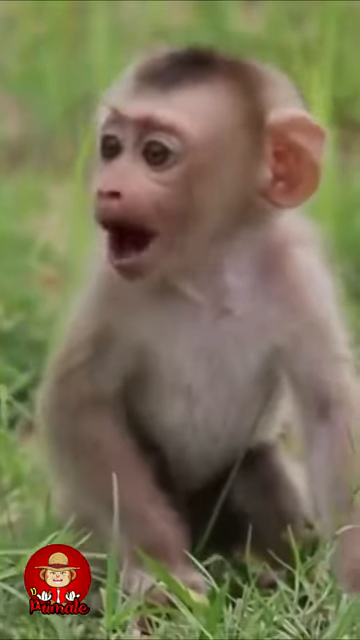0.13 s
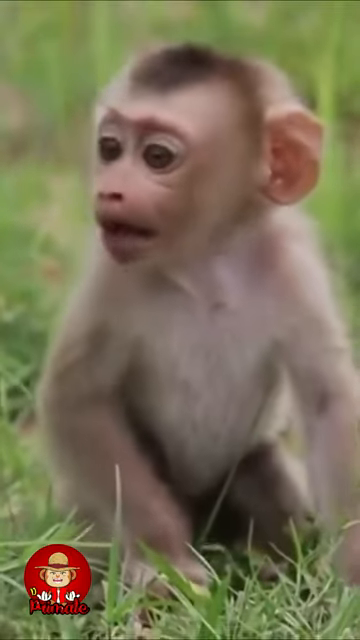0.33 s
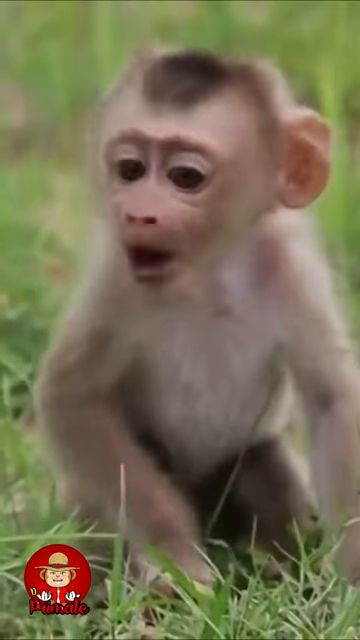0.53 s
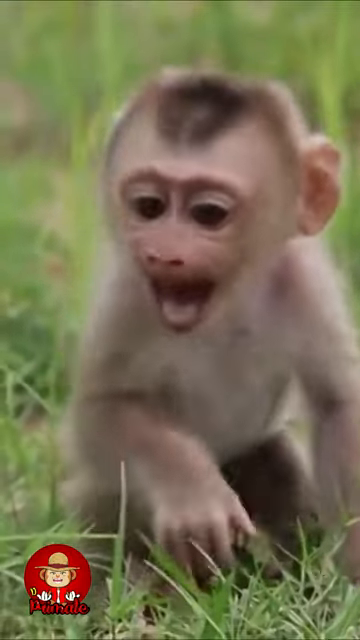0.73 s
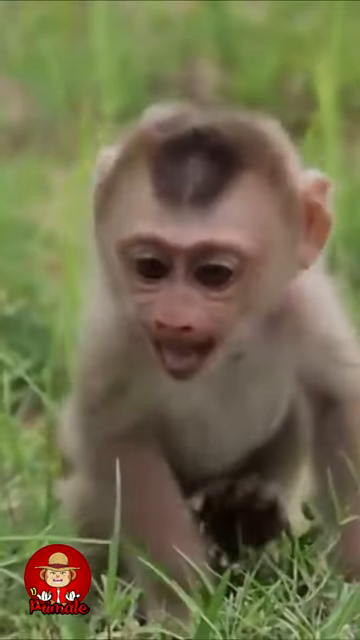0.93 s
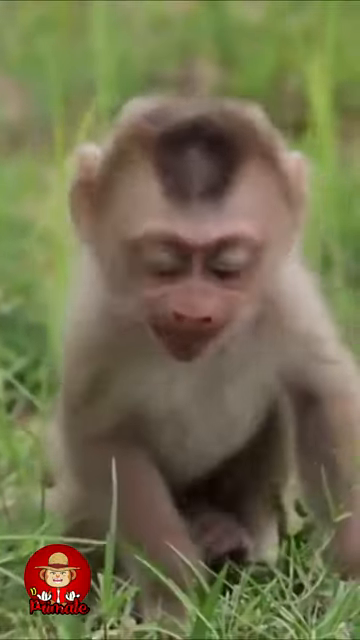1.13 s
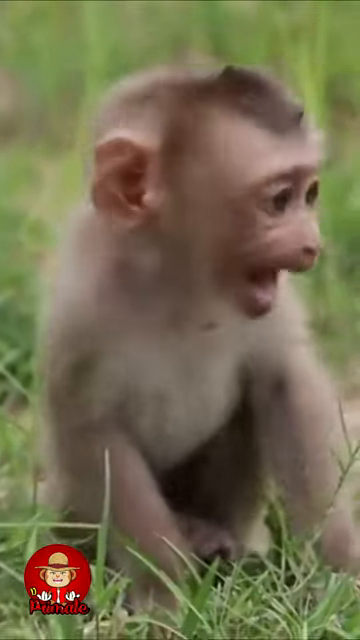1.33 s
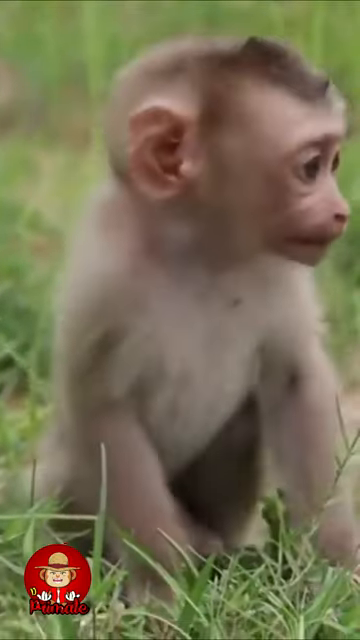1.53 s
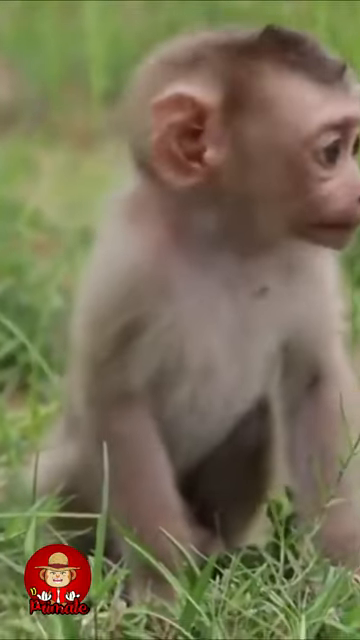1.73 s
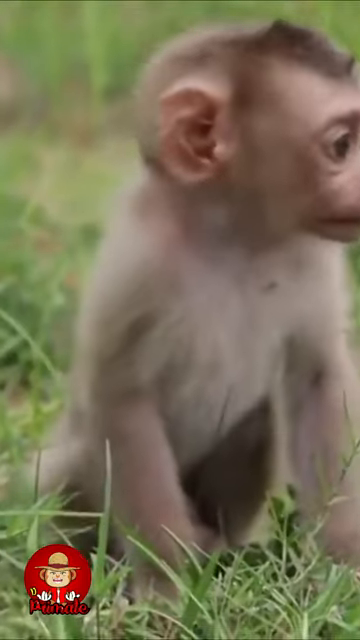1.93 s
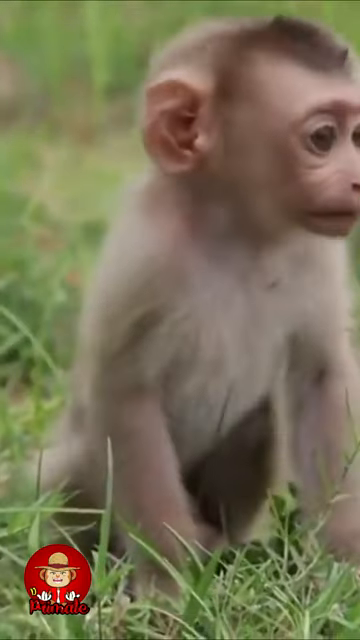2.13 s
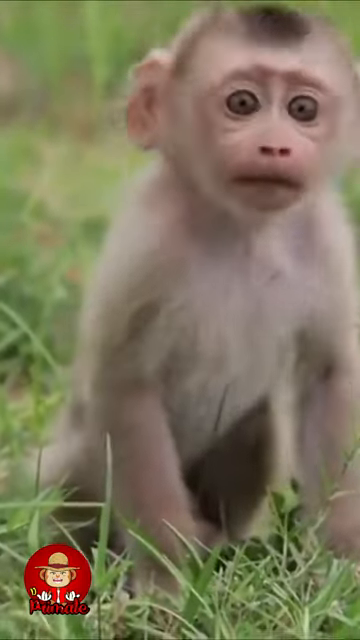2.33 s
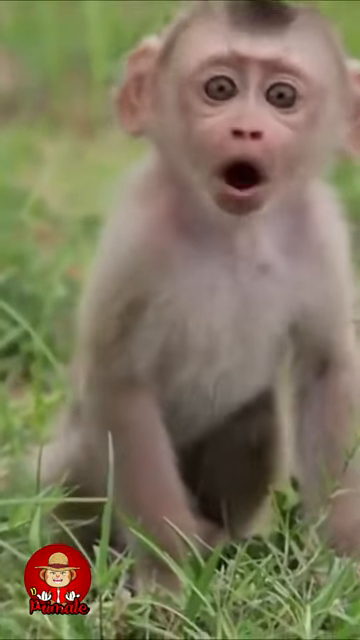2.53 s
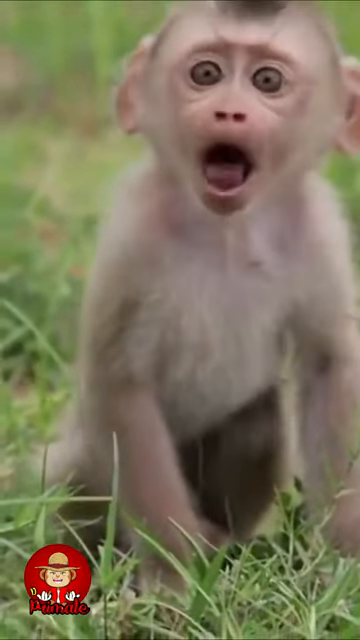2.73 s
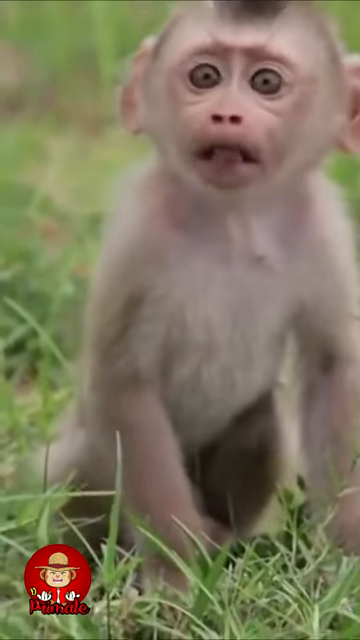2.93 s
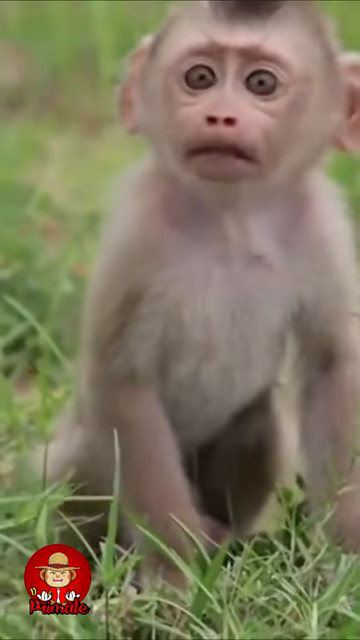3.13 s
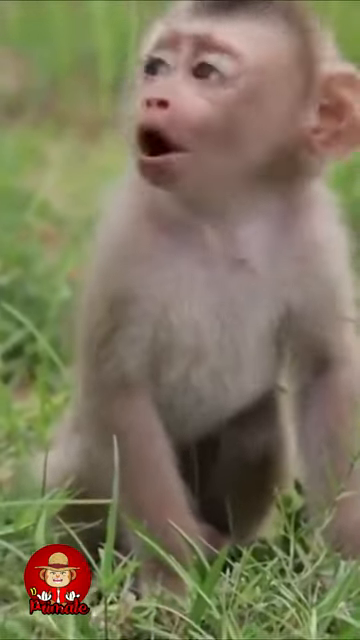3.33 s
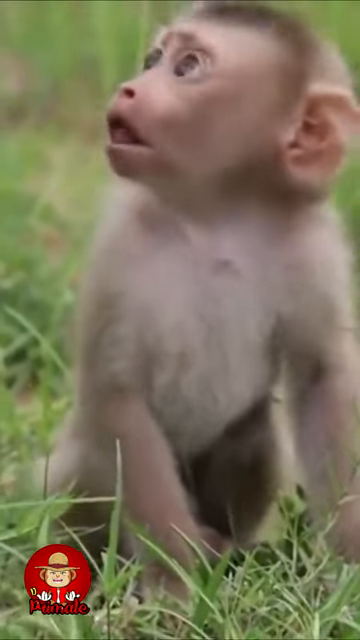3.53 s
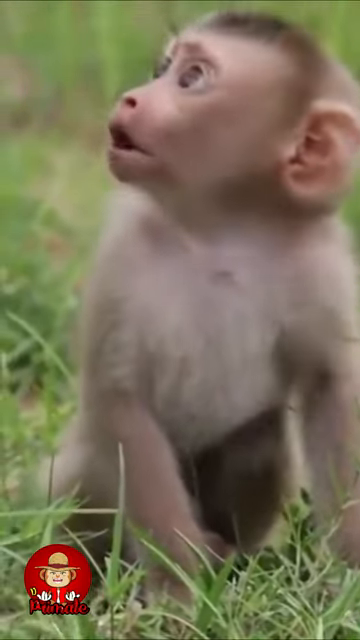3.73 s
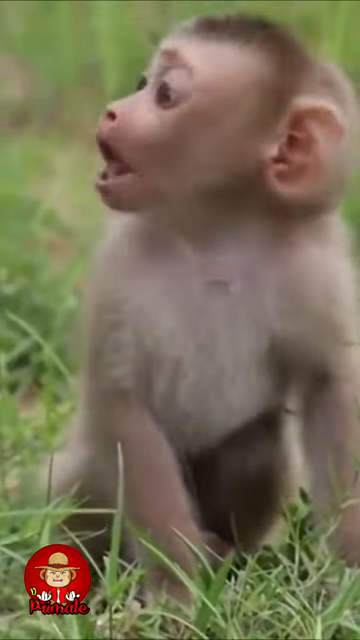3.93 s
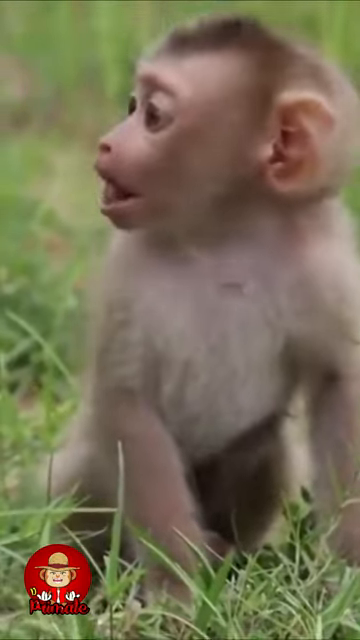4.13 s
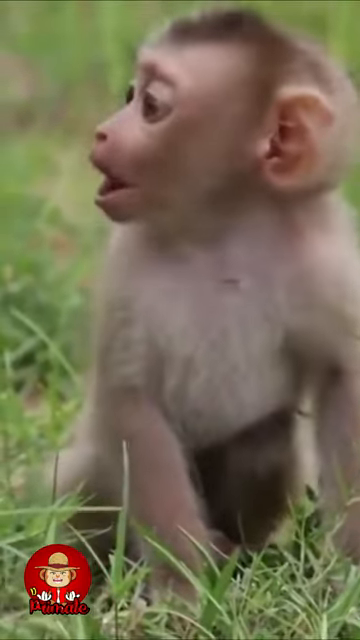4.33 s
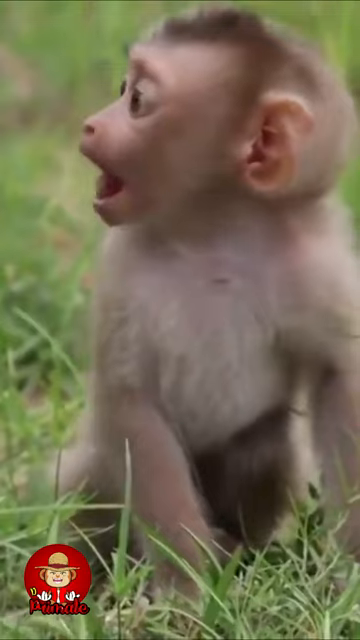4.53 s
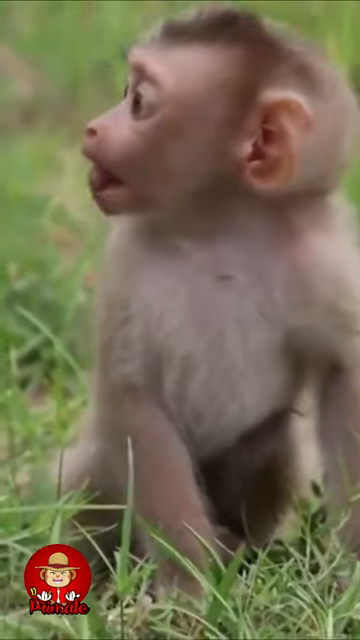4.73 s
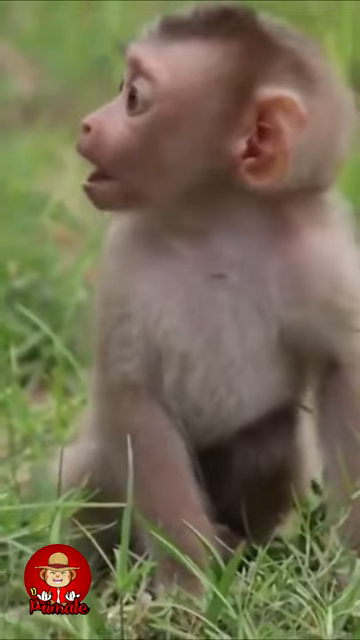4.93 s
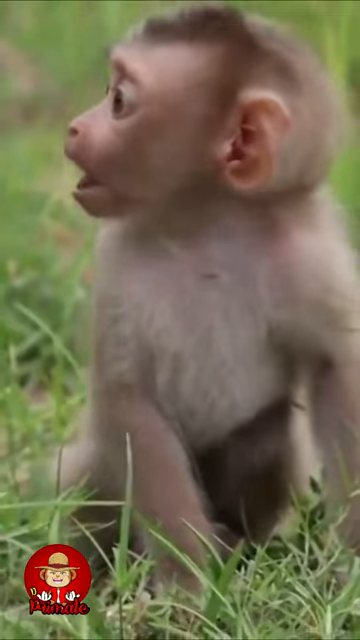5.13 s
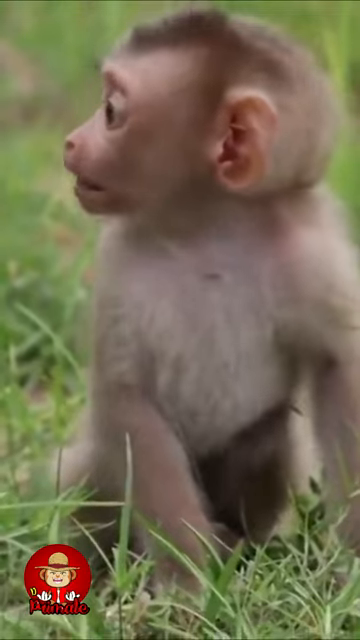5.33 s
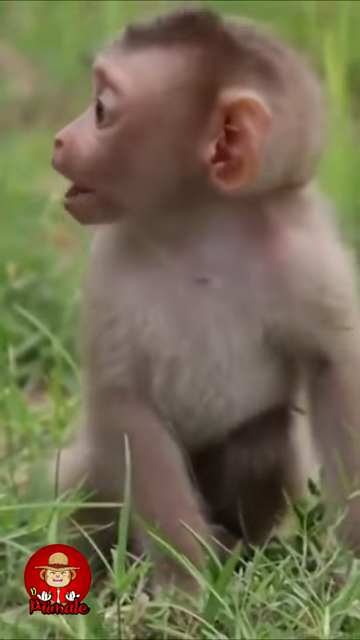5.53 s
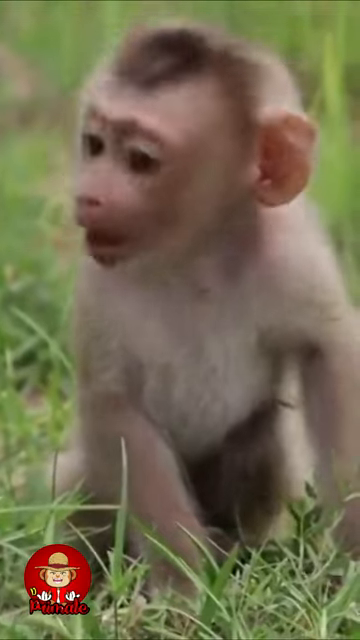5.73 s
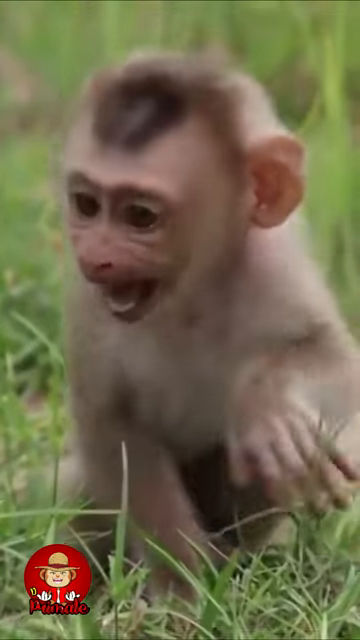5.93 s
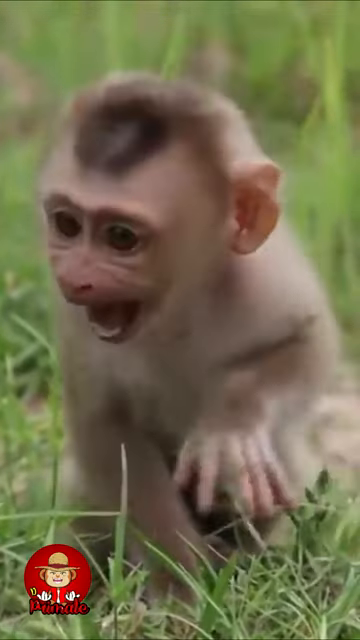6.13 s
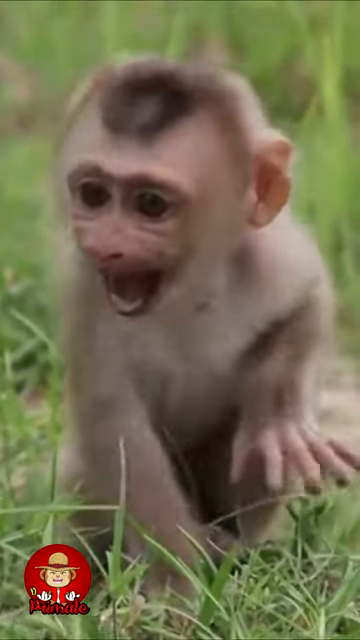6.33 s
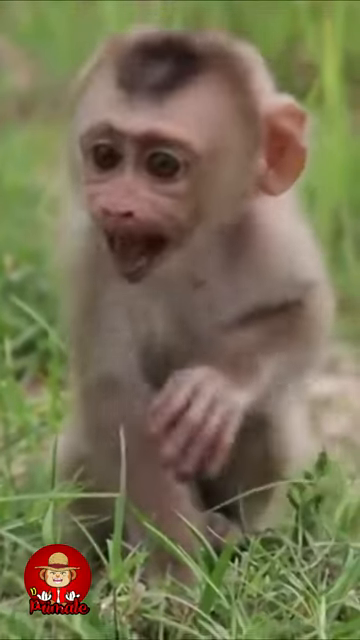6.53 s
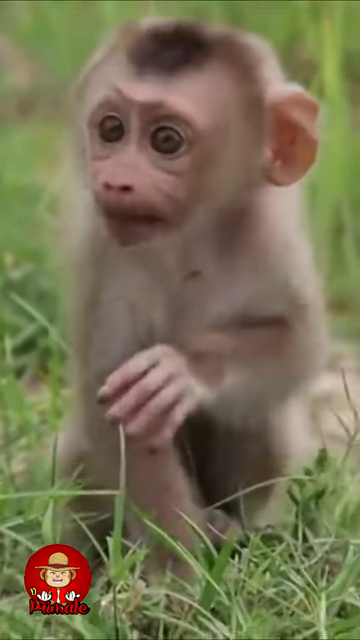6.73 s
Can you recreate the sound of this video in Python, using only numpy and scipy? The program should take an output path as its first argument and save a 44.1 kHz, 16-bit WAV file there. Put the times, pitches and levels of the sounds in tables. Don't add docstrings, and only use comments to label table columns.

```python
import sys
import numpy as np
from scipy import signal
from scipy.fft import rfft, irfft, next_fast_len
from scipy.io import wavfile
from scipy.ndimage import uniform_filter1d

SR = 44100
rng = np.random.default_rng(int(sys.argv[2]) if len(sys.argv) > 2 else 0)


def output_pcm(signal):
    pcm = np.clip(np.atleast_2d(signal).T, -1, 1) * 32767
    wavfile.write(sys.argv[1], SR, np.round(pcm).astype(np.int16))


def attenuation_scalar(level_db):
    decades = np.asarray(level_db, float) / 20
    return 10 ** decades


N = 298998
LONGEST = 6000

# partial the mouth favours, its lift in dB, roughness 0-1, and the
RISE = (1.2, 5.7, 0.018, 0.7)
CRY = (2.01, 20.2, 0.058, 0.31)
PEEP = (1.6, 42, 0.046, 0.36)
OPEN = (0.67, 5.3, 0.069, 3)
CLEAR = (2.2, 7.8, 0.13, 0.88)
HUSKY = (1.86, 3.9, 0.29, 0.64)
PINCHED = (2.05, 69, 0.63, 2.4)
BREAK = (1.5, 7.9, .6, 0.53)
BURST = (1.47, 7.4, .45, .08)
HALF = (3.19, 24, 0.46, 0.77)
HALF_WIDE = (4.8, 19, 0.43, 1.2)
HALF_RASP = (3, 9, .55, .99)
HALF_CLEAR = (5, 5, .1, .99)
THIRD = (3, 36, .03, .99)
THIRD_SOFT = (3, 22, .07, .99)
PAIR = (2.55, 60, .06, .99)
CRUMBLE = (2.3, 26, .7, .99)
YELP = (2.01, 17, .05, .99)
WHISTLE = (1.05, 14, .03, .99)
HOARSE = (1.05, 24, .33, .99)
SCREAM = (1.05, 20, .8, .99)
LEAP = (2.01, 45, .1, .99)
GASP = (1.05, 20, .85, .25)


def read(points, hz):
    f, value = np.transpose(points)
    return np.interp(np.log(hz + 1), np.log(f + 1), value)


def evened(x):
    return x / np.sqrt(np.mean(abs(x) ** 2) + 1e-20)


def wobble(size, hz):
    noise = rng.standard_normal(LONGEST)
    return evened(signal.lfilter(*signal.butter(2, hz, fs=SR), noise))[-size:]


def chaos(width_hz, count):
    at = np.cumsum(2 * width_hz) / SR
    whole = at.astype(int)
    a, b = rng.standard_normal((2, count, LONGEST // 5))
    z = a + 1j * b
    ease = np.sin(np.pi / 2 * (at - whole)) ** 2
    return evened(z[:, whole] * (1 - ease) + z[:, whole + 1] * ease)


def ducking():
    # moment in seconds, depth of the duck in dB (negative lifts).
    ducks = [(-.3, 5), (0.302, 6.5), (0.828, 12), (.94, -3), (1.45, 0.5), (2.89, 20.5), (4.118, 3),
             (4.618, 12.5), (4.72, -5.5), (5.78, 5), (6.12, 6), (6.52, 10.5)]
    open_field_db, duck_s, recover_s = -33, 0.024, 0.68
    start_s, depth_db = np.transpose(ducks)
    since = np.maximum(np.arange(N) / SR - start_s[:, None], 0)
    shape = np.minimum(since / duck_s, 1) * np.exp(-since / recover_s)
    return open_field_db - depth_db @ shape


def field():
    # frequency in Hz, level in dB per Hz.
    air_colour = [(15, -62), (25, -37), (86, -2.5), (253, -2.5), (401, -3), (510, -20), (569, -8.5),
                  (1030, -10.5), (1240, -8.5), (2430, -9.5), (3020, -13.5), (4900, -16.5), (9880, -31.5),
                  (13300, -36), (15600, -42)]
    # frequency in Hz, likeness 0-1.
    likeness = [(60, 1), (130, 0.98), (290, 0.99), (640, 0.55), (1410, 0.39), (3100, 0.047), (6820, 0.58),
                (15000, 0.19)]
    # frequency in Hz, left minus right in dB.
    air_lean = [(60, -4), (110, 3.5), (200, -1), (380, 3.5), (700, 0.5), (1290, 0), (2380, -5), (4400, 0),
                (8120, 0), (15000, 0.5)]
    frames, hz = N // 256 + 3, np.fft.rfftfreq(512, 1 / SR)
    a, b, c, d, patches = rng.standard_normal((frames, 257, 5)).T
    patches = uniform_filter1d(patches, size=7, axis=0)
    patches = evened(uniform_filter1d(patches, size=10, axis=1))
    same = np.clip(read(likeness, hz), -1, 1)[:, None]
    left = a + 1j * b
    right = same * left + np.sqrt(1 - same ** 2) * (c + 1j * d)
    side = np.array([.5, -.5])[:, None, None]
    level_db = read(air_colour, hz)[:, None] + 1.08 * patches + side * read(air_lean, hz)[:, None]
    z = np.array([left, right]) * attenuation_scalar(level_db)
    window = np.sqrt(signal.get_window("hann", 512))
    air = evened(signal.istft(z, window=window, nperseg=512)[1][:, :N])
    return air * attenuation_scalar(ducking() + 4.0)


def note(s, start_hz, end_hz, way, end, opening, turn_in, next_rough):
    # frequency in Hz, level in dB.
    throat = [(700, -74), (950, -29), (1150, -3), (1500, -7.5), (2700, -2), (3800, -9.5), (5500, -25.5),
              (6500, -28), (8500, -29.5), (11500, -48), (15000, -58)]
    # offset in Hz, level in dB.
    side_lines = [(-3950, -40), (3950, -33), (7900, -42)]
    strands = [(-1, .75), (1, .9), (2, .75), (3, .3)]
    blend = 130
    favoured, lift_db, rough = way[:3]
    rough, main = np.clip(rough, 0, 1), max(round(favoured), 1)
    first = round(s * SR) - blend
    t = np.arange(first, round(end * SR) + blend) / SR
    done = (t - s) / (end - s)

    shed = 0.6 * max(rough - next_rough, 0) * np.clip(done, 0, 1) ** 3
    rough = np.clip(rough - shed, 0, 1)

    hz = start_hz + (end_hz - start_hz) * (np.sin(np.pi / 2 * done) if opening else done)
    hz *= 1 + 0.0043 * wobble(len(t), 71) + 0.0221 * rough * wobble(len(t), 234)
    turn = 2 * np.pi * np.cumsum(hz) / SR + turn_in / main

    k = np.arange(1, 15)[:, None]
    subharmonic = favoured > 2.8
    lift = np.exp(-((k - favoured) / .62) ** 2)
    lift = lift + 1.02 * np.exp(-((k - 1.85 * main) / (.31 * favoured)) ** 2) * subharmonic
    lift = lift + 0.61 * (k % main == 0) * (k > 2 * main) * subharmonic
    size = attenuation_scalar(read(throat, k * hz) + lift_db * lift) * (k * hz < 15300)
    width_hz = np.minimum(140 + .17 * rough * hz, 330)
    smear = np.sqrt(1 - rough) + np.sqrt(rough) * chaos(width_hz, count=14)
    smear /= (abs(smear) + .07) ** .7
    lines = size * smear * np.exp(1j * (k * turn - 0.42 * (k - main) ** 2))
    tone = lines.sum(0) / np.sqrt((size ** 2).sum(0))

    split = np.clip(4 * (rough - .58), 0, 1)
    beat = 2 * np.pi * np.cumsum(800 * (1 + .1 * wobble(len(t), 15))) / SR
    strand_sum = sum(a * chaos(70. + 0 * t, count=1)[0] * np.exp(1j * n * beat) for n, a in strands)
    tone *= (1 + split * strand_sum) / np.sqrt(1 + 1.9 * split ** 2)
    if 6.435 < s < 6.6:
        for other_hz, db in side_lines:
            tone += attenuation_scalar(db) * np.exp(1j * (turn + 2 * np.pi * other_hz * t))

    mouth_hz = np.clip(favoured * hz + 700, 2900, 8300)
    rasp = chaos(850 + .06 * mouth_hz, count=1)[0] * np.exp(2j * np.pi * np.cumsum(mouth_hz) / SR)
    rasp_size = (0.06 * (hz < 4500) + .5 * rough) * max(1 - 0.78 * split.max(), .15)
    lumps = attenuation_scalar(3.0 * rough ** 2 * wobble(len(t), 130) + .9 * rough ** 2)
    breath_size = 0.02 + 0.047 * rough + 0.039 * split + 0.087 * (opening and start_hz > 1600)
    breath = breath_size * rng.standard_normal(LONGEST)[:len(t)]
    sound = (np.sqrt(2) * (tone + rasp_size * rasp).real + breath) * lumps
    fades = signal.windows.tukey(len(t), 4 * blend / len(t))
    return first, sound * fades, main * turn[-2 * blend - 1]


def effort(call, jumps):
    s, _, _, peak_db, end, way = call
    jump_s, last_s, last_db = jumps[0][0], jumps[-1][0], jumps[-1][3]
    top_s = s + np.clip(way[3], .1, .8) * (jump_s - s)
    sag_db = 112 * (jump_s - top_s)
    points = [(s - .004, peak_db - 24.5), (top_s, peak_db), (jump_s - .003, peak_db - sag_db)]
    for (at, _, _, db, way), after in zip(jumps, jumps[1:]):
        moved_s = at + np.clip(way[3], .05, .99) * (after[0] - at)
        points += [(at, db), (moved_s, after[3])]
    return points + [(last_s, last_db), (end - 0.0092, last_db - 5.5), (end + .003, -55)]


def monkey():
    # start in seconds, pitch from and to in Hz, peak in dB,
    # end of the call in seconds, way.
    openings = [
        (0.223, 1140, 1407, -10, .414, RISE),
        (0.719, 1142, 1395, -12.5, 1.078, RISE),
        (1.382, 1900, 3510, -11, 1.622, CRY),
        (2.752, 1111, 1250, -17, 3.022, RISE),
        (3.498, 1098, 1303, -19.5, 3.648, RISE),
        (3.932, 1133, 1329, -16, 4.162, RISE),
        (4.476, 1140, 1415, -12, 4.7, RISE),
        (5.108, 1176, 1365, -13.5, 5.298, RISE),
        (5.612, 1134, 1364, -13, 5.852, RISE),
        (6.103, 2215, 3030, -9, 6.636, PEEP),
    ]
    # start in seconds, pitch from and to in Hz,
    # level in dB, way.
    restless = [
        [(.275, 1650, 1597, -11.5, BREAK), (.292, 1330, 1465, -20.5, HUSKY), (.328, 690, 690, -13.5, HALF_RASP),
         (.362, 1500, 1607, -15, HUSKY), (.385, 800, 676, -17, HALF_WIDE)],
        [(.762, 1600, 1700, -20.5, BREAK), (.805, 1280, 1333, -12.5, PINCHED), (.838, 1350, 1972, -13, PINCHED),
         (.86, 1450, 1664, -14, PAIR), (.882, 1630, 1680, -18.5, PAIR), (.914, 5300, 5700, -19.5, GASP),
         (.935, 5400, 6200, -33, SCREAM), (.99, 6100, 2823, -26.5, SCREAM), (1.047, 1450, 1570, -16, PAIR)],
        [(1.432, 3900, 3690, -21, SCREAM), (1.475, 2000, 1300, -17.5, CRUMBLE),
         (1.515, 1550, 1060, -20.5, CRUMBLE), (1.556, 1450, 1317, -27, CRUMBLE)],
        [(2.8, 1270, 1210, -15, OPEN), (2.83, 1500, 1760, -24.5, BURST), (2.872, 1075, 1352, -12.5, PINCHED),
         (2.925, 890, 917, -9, THIRD), (2.958, 912, 820, -8.5, THIRD), (2.98, 2600, 2850, -22, HOARSE)],
    ]
    aside = [
        [(3.555, 1229, 1304, -26, OPEN), (3.585, 1292, 1214, -25, OPEN), (3.617, 610, 638, -25, HALF_CLEAR)],
        [(3.995, 1290, 1316, -13, OPEN), (4.015, 1518, 1644, -21.5, BREAK), (4.055, 1352, 1576, -17, HUSKY),
         (4.092, 700, 647, -13, HALF), (4.115, 1383, 1167, -13.5, CLEAR), (4.128, 1087, 1330, -23.5, CLEAR),
         (4.145, 646, 630, -22, HALF_WIDE)],
        [(4.538, 1662, 1675, -19, BREAK), (4.567, 1440, 1524, -15.5, HUSKY), (4.597, 744, 872, -13, HALF),
         (4.622, 910, 849, -8.5, THIRD_SOFT), (4.655, 838, 905, -18, THIRD_SOFT), (4.672, 887, 790, -20, HALF)],
        [(5.172, 1510, 1470, -16, BREAK), (5.19, 1354, 1263, -22, CLEAR), (5.222, 1244, 1440, -15.5, CLEAR),
         (5.245, 679, 637, -14, HALF), (5.278, 648, 550, -21, HALF_WIDE)],
        [(5.68, 1576, 1726, -22, BREAK), (5.727, 1267, 1573, -15, CLEAR), (5.752, 733, 774, -13.5, HALF),
         (5.778, 1753, 1300, -11.5, HUSKY), (5.797, 1358, 1236, -18, YELP), (5.808, 1417, 1640, -11.5, HUSKY),
         (5.818, 970, 720, -19.5, HALF)],
    ]
    screamed = [(6.118, 2100, 2990, -21.5, LEAP), (6.14, 5810, 6150, -13, HOARSE),
                (6.185, 6520, 6860, -16, SCREAM), (6.25, 6900, 7320, -16.5, SCREAM),
                (6.335, 6990, 7410, -18.5, SCREAM)]
    whistled = [(6.445, 7500, 6520, -15, WHISTLE), (6.482, 6420, 6280, -10, WHISTLE),
                (6.503, 6270, 6650, -10.5, WHISTLE), (6.538, 6400, 6170, -12, WHISTLE),
                (6.568, 6160, 5720, -7, WHISTLE), (6.584, 5730, 4520, -22.5, WHISTLE),
                (6.606, 1360, 1165, -25, HALF)]
    # frequency in Hz, radians the left leads.
    port_phase = [(900, 0.52), (1800, -1.12), (2300, -0.86), (2700, 0.81), (3600, 1), (4600, 0.43),
                  (7000, 0.63), (12000, 0.86)]
    # frequency in Hz, left minus right in dB.
    port_lean = [(1000, 7), (1800, -1.5), (2300, -6), (3000, -1.3), (4500, 1.5), (9000, -1.3)]
    # time in seconds, left minus right in dB.
    head_turn = [(0, 0), (3.6, 0.5), (4.1, -1), (5.3, -0.5), (5.9, -0.3), (6.78, -0.5)]

    voice, points = np.zeros(N), []
    for call, jumps in zip(openings, restless + aside + [screamed + whistled]):
        turn = 0
        ends = [jump[0] for jump in jumps] + [call[4]]
        for row, after, end in zip([call] + jumps, jumps + jumps[-1:], ends):
            at, sound, turn = note(*row[:3], row[-1], end, row is call, turn, after[4][2])
            voice[at:at + len(sound)] += sound
        points += effort(call, jumps)
    voice = signal.sosfilt(signal.butter(4, 950, "high", fs=SR, output="sos"), voice)

    size = next_fast_len(N)
    t, hz = np.arange(N) / SR, np.fft.rfftfreq(size, 1 / SR)
    side = np.array([[.5], [-.5]])
    placing = np.exp(1j * side * read(port_phase, hz)) * attenuation_scalar(side * read(port_lean, hz))
    ports = irfft(rfft(voice, size) * placing, size)[:, :N]
    level_db = np.interp(t, *np.transpose(points)) + side * np.interp(t, *np.transpose(head_turn))
    return ports * attenuation_scalar(uniform_filter1d(level_db, size=220))


def ground(x, t60=.09):
    t = np.arange(4000) / SR
    signs = rng.choice([-1., 1.], (2, 4000))
    sparse = rng.random((2, 4000)) < .05
    taps = signs * sparse * attenuation_scalar(-60 * t / t60) * (t > .002)
    return signal.oaconvolve(x, taps / np.linalg.norm(taps[0]), axes=1)[:, :N]


def huffs():
    # start in seconds, peak in dB, centre in Hz.
    puffs = [
        (4.7242, -40, 4340),
        (6.666, -37.5, 3410),
        (6.7476, -40, 4290),
    ]
    out, t = np.zeros(N), np.arange(1200) / SR
    for s, db, hz in puffs:
        puff = chaos(490.0 + 0 * t, count=1)[0] * np.exp(2j * np.pi * hz * t) * np.hanning(len(t))
        part = out[round(s * SR):][:len(t)]
        part += attenuation_scalar(db - 2.5) * puff.real[:len(part)]
    return out


def scene():
    voice = monkey()
    return voice + attenuation_scalar(-23) * ground(voice) + huffs() + field()


def soft_ceiling(x, ceiling=.95, knee=.65):
    over, room = np.maximum(abs(x) - knee, 0), ceiling - knee
    return x - np.sign(x) * (over - room * np.tanh(over / room))


def empty_weak_bands(x):
    # frequency in Hz, threshold in dB.
    holes = [(5500, -75), (6600, -43), (8000, -46), (10000, -48.5), (12000, -56), (15000, -57)]
    hz, _, z = signal.stft(x, SR, nperseg=1024)
    power = (abs(z) ** 2).mean(0)[:512].reshape(32, 16, -1).sum(1)
    luck_db = 10.0 * evened(uniform_filter1d(rng.standard_normal(power.shape), size=5))
    relative_db = 10 * np.log10(power / power.sum(0) ** .6 + 1e-12)
    weak = relative_db + luck_db < read(holes, hz[8::16])[:, None]
    z[:, :512] *= np.repeat(~weak, 16, axis=0)
    return signal.istft(z, SR, nperseg=1024)[1][:, :N]


def low_pass(x):
    return signal.sosfilt(signal.butter(12, 15760, fs=SR, output="sos"), x)


def record(dry):
    dry = signal.sosfilt(signal.butter(2, 60, "high", fs=SR, output="sos"), dry)
    mix = empty_weak_bands(soft_ceiling(dry))
    return low_pass(mix)


dry = scene()
out = record(dry)
output_pcm(out)
```